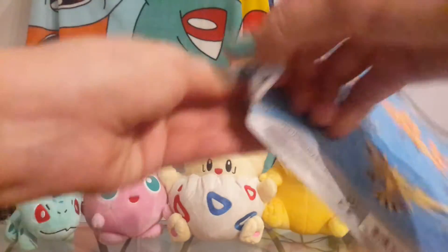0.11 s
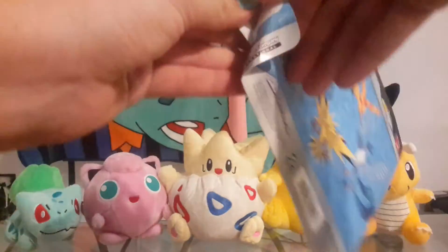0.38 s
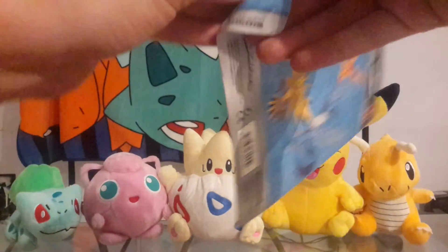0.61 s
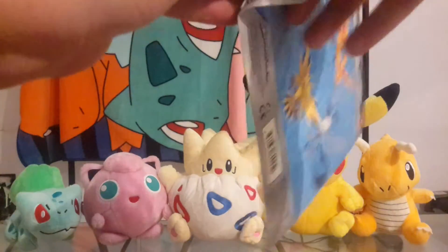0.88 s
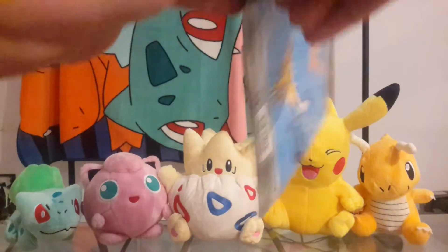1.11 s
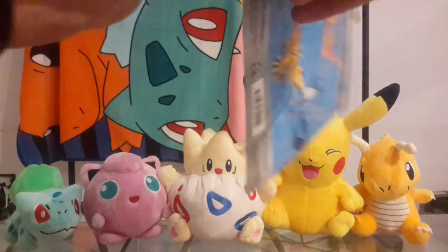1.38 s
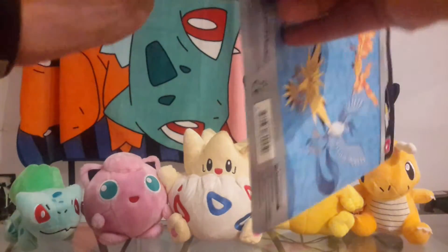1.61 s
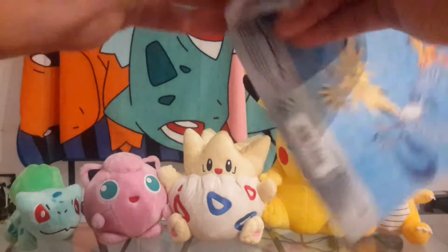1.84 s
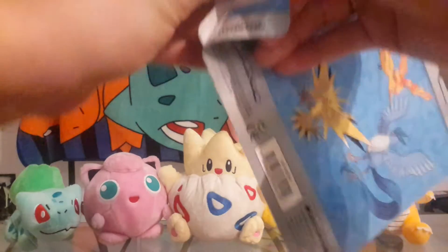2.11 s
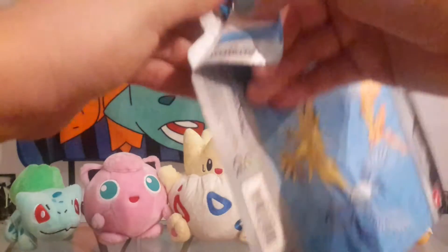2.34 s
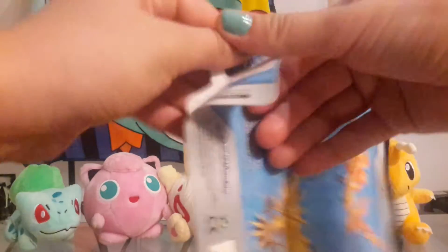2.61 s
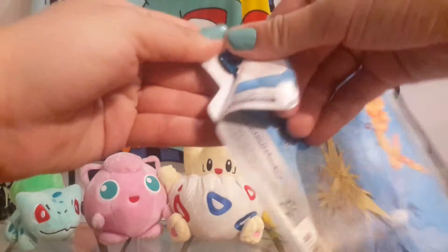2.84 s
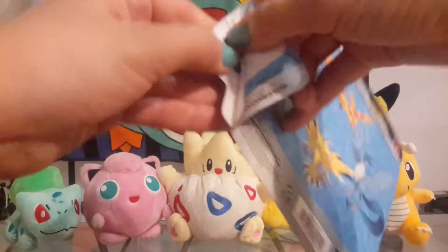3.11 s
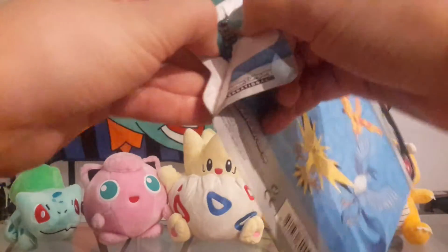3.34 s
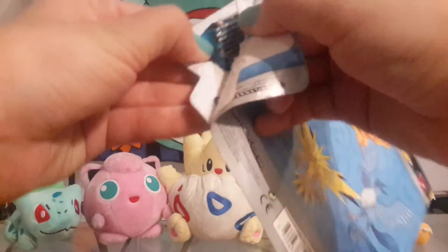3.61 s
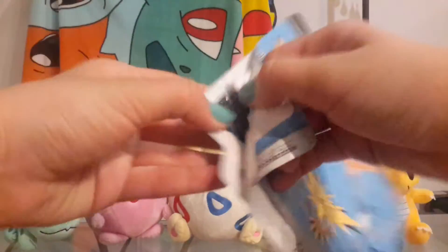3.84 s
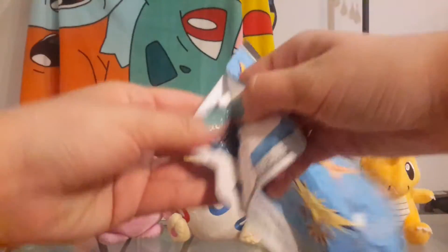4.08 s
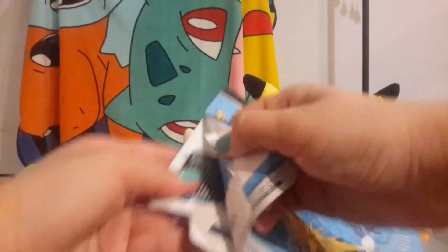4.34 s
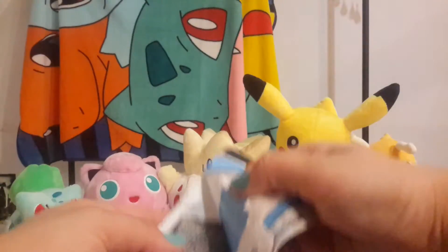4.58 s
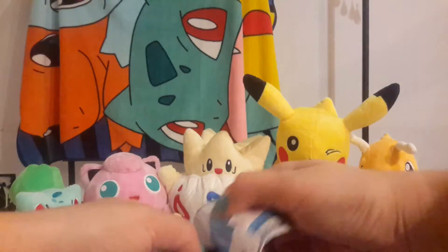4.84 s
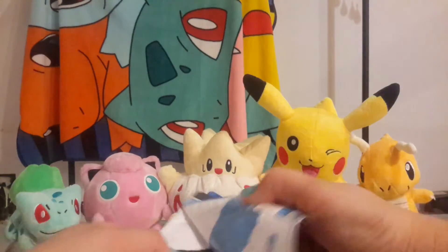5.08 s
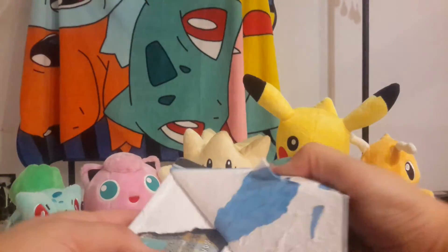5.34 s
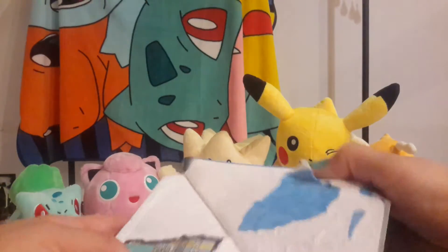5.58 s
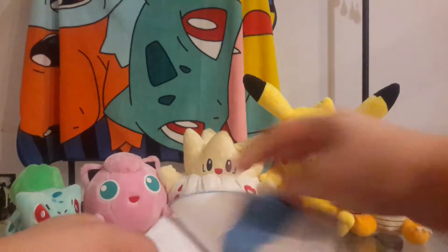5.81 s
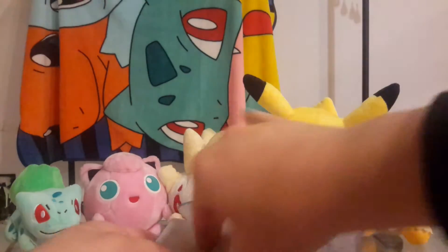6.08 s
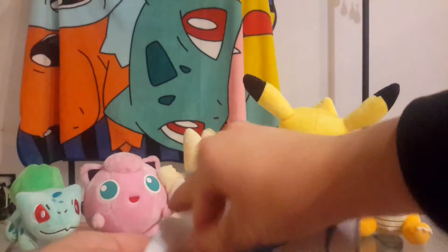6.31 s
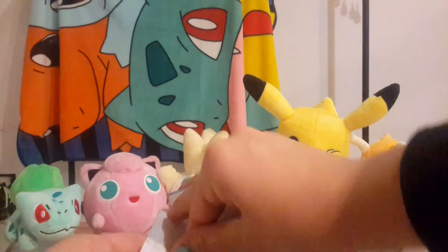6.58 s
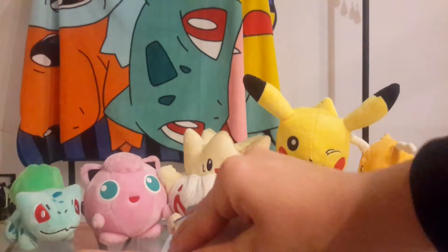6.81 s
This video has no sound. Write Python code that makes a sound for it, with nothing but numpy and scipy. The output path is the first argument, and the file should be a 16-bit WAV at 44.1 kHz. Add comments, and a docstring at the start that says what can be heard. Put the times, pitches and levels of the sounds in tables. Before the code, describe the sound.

Close hands crinkle and pry at a stiff plastic and card packet, snapping creases, then tear it open and knock it on a glass table.

```python
"""Hands pry and tear a plastic and cardboard pack close by in a quiet room, and knock it on a glass table.
Fibres break in dense crackle that rings the shell and the card; a taut shell sings as it peels.
Creases snap as a kick and a rattle; blows ring the modes of the glass; fingers thump the card dully.
Behind it lie the room's short tail, a steady hiss and a low, beating hum."""
import sys
import numpy as np
from scipy import signal
from scipy.fft import rfft, irfft
from scipy.io import wavfile
from scipy.ndimage import uniform_filter1d

SR = 44100
rng = np.random.default_rng(int(sys.argv[2]) if len(sys.argv) > 2 else 0)


def gain_from_decibels(decibels):
    """Convert decibel values to linear amplitude factors."""
    exponent = np.asarray(decibels, float) / 20
    return 10 ** exponent


def log_audio(samples):
    """Write samples as a 16-bit WAV file to the path given in sys.argv[1]."""
    # one column per channel
    frames = np.atleast_2d(samples).T
    # limit to full scale, then quantise
    limited = np.clip(frames, -1, 1)
    pcm = np.round(limited * 32767).astype(np.int16)
    wavfile.write(sys.argv[1], SR, pcm)


N = 306054  # length in samples


def evened(x):
    """Scales to rms 1."""
    return x / np.sqrt(np.mean(x ** 2) + 1e-20)


def read(points, hz):
    """Reads a spectrum in dB on a log-frequency axis, falling to -60 dB or less outside it."""
    f, value = np.transpose(points)
    low, high = min(value[0], -60), min(value[-1], -60)
    return np.interp(np.log(hz + 1), np.log(f + 1), value, left=low, right=high)


def coloured(x, points):
    """Minimum-phase filter with the given spectrum, so that nothing rings ahead of a click."""
    hz = abs(np.fft.fftfreq(4096, 1 / SR))
    log_gain = np.log(gain_from_decibels(read(points, hz)))
    taps = np.fft.ifft(np.exp(np.conj(signal.hilbert(log_gain)))).real[:2048]
    return signal.oaconvolve(x, taps)[:len(x)]


def add(mix, s, db, sound):
    """Mixes a sound in at time s with the given peak level."""
    part = mix[round(s * SR):][:len(sound)]
    part += (gain_from_decibels(db) * sound / abs(sound).max())[:len(part)]


def resonate(x, hz, width):
    """A resonance of gain 1, width in Hz, that follows the curve hz: shift down, smooth, shift back."""
    turn = np.exp(2j * np.pi * np.cumsum(hz) / SR)
    r = np.exp(-np.pi * width / SR)
    return 2 * (turn * signal.lfilter([1 - r], [1, -r], x / turn)).real


def steep(x, hz, width):
    """The resonance twice, for dark skirts."""
    return resonate(resonate(x, hz, width), hz, width)


# Spectrum of the room hiss, relative: (frequency [Hz], level [dB])
HISS_SPECTRUM = [(25, -25), (42, -9), (60, 18), (85, 0), (115, 4.5), (160, 6.5), (320, -2.5), (600, -8),
                 (1200, -5.5), (3600, -12.5), (8600, -15.5), (15300, -16), (15800, -52)]
# Lines of the low hum: (frequency [Hz], rms level before the gain swell [dB])
HUM_LINES = [(59.2, -76), (65.2, -78), (118.4, -81), (296.1, -80), (355.3, -83)]


def air():
    """Shaped noise for the hiss; sines for the hum, whose two lowest lines beat, under a slow gain swell."""
    t = np.arange(N) / SR
    spectrum = rfft(rng.standard_normal(N)) * gain_from_decibels(read(HISS_SPECTRUM, np.fft.rfftfreq(N, 1 / SR)))
    hiss = gain_from_decibels(-65) * evened(irfft(spectrum, N))
    swell_db = 3 * np.cos(2 * np.pi * (t - .15) / 1.8)  # a regular gain swell with a period of 1.8 s
    hum = sum(gain_from_decibels(db) * np.sqrt(2) * np.sin(2 * np.pi * hz * t + 1.7) for hz, db in HUM_LINES)
    return hiss + gain_from_decibels(swell_db) * hum


# Decay of the room: (frequency [Hz], t60 [s])
ROOM_DECAY = [(200, 0.33), (1000, 0.13), (4000, 0.1), (12000, 0.076)]


def room(x):
    """Reflections as sparse taps of random sign, each band dying at its own speed."""
    taps = np.zeros(SR // 2)
    at = np.arange(300, len(taps) - 20, 20)  # first one after about 7 ms
    taps[at + rng.integers(0, 20, len(at))] = rng.choice([-1., 1.], len(at))
    hz, t, z = signal.stft(taps, SR, nperseg=256)
    decay_hz, decay_s = np.transpose(ROOM_DECAY)
    t60 = np.interp(np.log(hz + 1), np.log(decay_hz), decay_s)
    tail = signal.istft(z * gain_from_decibels(-60 * t / t60[:, None]), SR, nperseg=256)[1]
    return signal.fftconvolve(x, tail / np.linalg.norm(tail))[:N]


# Spectrum of the low rub of hand on card, relative: (frequency [Hz], level [dB])
RUB_SPECTRUM = [(60, -27), (105, -5.5), (150, -2), (300, 6), (550, 5), (800, 1), (1200, -3.5)]
# Dull finger thumps on the card: (time [s], peak level [dB], ring [Hz], t60 [s], at least 8 ms is used)
FINGER_THUMPS = [(0.222, -33, 647, 0.026), (0.276, -43, 277, 0.048), (0.315, -87, 622, 0.047),
                 (1.918, -25.5, 300, 0.019), (1.921, -35.5, 543, 0.052), (1.982, -36, 470, 0.023),
                 (2.224, -44.5, 303, 0.037), (2.38, -31, 563, 0.016), (2.636, -31, 715, 0.007),
                 (3.989, -38.5, 179, 0.11), (4.282, -39, 307, 0.045), (4.754, -25.5, 340, 0.03),
                 (4.888, -14.5, 179.4, 0.063), (5.307, -29.5, 532, 0.062), (5.699, -24.5, 328, 0.034),
                 (5.857, -21, 340, 0.016), (6.723, -32, 166, 0.036), (6.755, -32, 153, .04)]


def thumps():
    """A soft push on the card: a short dull ring with some rub in it."""
    out, t = np.zeros(N), np.arange(6000) / SR
    noises = rng.standard_normal((len(FINGER_THUMPS), len(t)))
    for (s, db, hz, t60), noise in zip(FINGER_THUMPS, noises):
        fall = gain_from_decibels(-60 * t / max(t60, .008))
        ring = evened(np.sin(2 * np.pi * hz * t) * fall)
        rub = evened(coloured(noise * fall, RUB_SPECTRUM))
        attack = np.minimum(t * hz / 0.37, 1)  # full after 0.37 cycles
        add(out, s, db, (ring + 0.42 * rub) * attack)
    return out


# Spectra of the plastic shell and of the card, relative: (frequency [Hz], level [dB])
SHELL_SPECTRUM = [(2000, -3), (2500, -6), (3300, -2), (4200, -7), (5200, -11.5), (6500, -17), (8000, -24.5)]
CARD_SPECTRUM = [(550, -25), (850, -2.5), (1300, -2), (1800, 0.5), (2300, -0.5), (3000, -9)]
# Modes of the glass table top: (frequency [Hz], level [dB], t60 [s])
GLASS_MODES = [(126, -9.5, 0.14), (176, 0, .11), (234.1, -9, 0.16), (286.7, -13, 0.2), (434.7, -7, 0.16),
               (537, -1.5, 0.073), (615, -5.5, 0.058), (949, 5.5, 0.084), (980, -24, 0.24),
               (1088, -14, 0.046), (1308, 0.5, 0.027), (1421, -8.5, 0.1), (1599, -7, 0.11),
               (1775, -20, 0.19), (2090, -6.5, 0.028), (2355, -4, 0.025), (2940, -8, 0.046),
               (3200, -11.5, 0.04), (3600, -13, 0.042)]
# Pack knocked on the table: (time [s], glass peak level [dB], hardness [dB per octave],
# ring length [factor on t60], card slap relative to the glass [dB])
TABLE_KNOCKS = [(4.8752, -9, 0.2, 1, 0), (5.9627, -4.5, -0.1, 0.69, -21), (6.0404, -17.5, -2, 0.49, -10),
                (6.1155, -4.5, 0.4, 0.82, -10), (6.155, -18.5, 4.5, 0.67, -9), (6.5602, -7, 0.5, 0.68, -10),
                (6.7467, -26.5, 1, 0.49, -26), (6.915, -8, -0.5, 0.73, -8.5)]


def knocks():
    """Each blow rings all modes of the glass, a harder one the upper ones more; card slaps and a hard edge ticks."""
    out, t = np.zeros(N), np.arange(12000) / SR
    hz, mode_db, t60 = np.transpose(GLASS_MODES)[:, :, None]
    spots = rng.standard_normal((len(TABLE_KNOCKS), 2, len(GLASS_MODES), 1))  # mode levels and phases vary by blow
    noises = rng.standard_normal((len(TABLE_KNOCKS), len(t)))
    build_cycles = 2.2
    rise = np.sin(np.pi / 2 * np.minimum(t * hz / build_cycles, 1)) ** 2  # low modes take longer to build
    for (s, db, tilt_db, length, slap_db), spot, noise in zip(TABLE_KNOCKS, spots, noises):
        level_db = mode_db + tilt_db * np.log2(hz / 900) + spot[0] - 60 * t / (t60 * length)
        modes = rise * gain_from_decibels(level_db) * np.sin(2 * np.pi * hz * t + .5 * spot[1])
        add(out, s, db, -modes.sum(0))
        slap = noise * gain_from_decibels(-60 * t / 0.05)
        slap = evened(coloured(slap, CARD_SPECTRUM)) + 0.38 * evened(coloured(slap, SHELL_SPECTRUM))
        add(out, s, db + slap_db, slap)
        tick = noise[::-1] * gain_from_decibels(-60 * t / 0.017)
        add(out, s, db - 27.5, steep(tick, np.full(len(t), 4700), width=920))
    return out


# How hard the hands work the pack: (time [s], shell rustle level [dB])
HAND_EFFORT = [(0, -54), (.088, -41), (.15, -58.5), (.22, -50.5), (.331, -48.5), (.373, -52.5),
               (.449, -76.5), (.51, -80.5), (.55, -66), (.629, -56.5), (.744, -59.5), (.802, -55.5),
               (.835, -59), (.86, -73), (.956, -75), (.996, -60), (1.058, -77), (1.153, -84),
               (1.193, -53.5), (1.231, -77), (1.411, -72), (1.527, -59.5), (1.67, -60), (1.81, -40.5),
               (1.87, -44), (1.95, -49), (2.069, -59), (2.125, -49), (2.305, -60), (2.378, -46),
               (2.386, -44), (2.45, -44.5), (2.546, -53.5), (2.736, -53.5), (2.78, -61), (2.895, -50.5),
               (3.039, -68.5), (3.159, -62), (3.201, -72), (3.243, -58), (3.332, -57), (3.464, -48.5),
               (3.51, -37), (3.518, -28.5), (3.652, -43.5), (3.713, -30), (3.759, -32), (3.853, -38.5),
               (3.903, -48), (4.065, -51), (4.099, -62), (4.198, -65.5), (4.228, -46.5), (4.273, -63),
               (4.281, -51), (4.398, -41.5), (4.448, -26), (4.496, -17.5), (4.525, -22.5), (4.606, -18.5),
               (4.691, -38), (4.765, -43.5), (4.809, -54.5), (4.876, -52.5), (4.881, -32.5), (4.941, -49),
               (5.009, -47), (5.017, -35.5), (5.096, -31.5), (5.14, -22.5), (5.2, -25), (5.225, -18),
               (5.28, -25.5), (5.315, -22.5), (5.365, -27.5), (5.41, -23.5), (5.474, -28), (5.555, -21),
               (5.609, -29), (5.66, -26.5), (5.695, -17), (5.73, -21), (5.76, -32.5), (5.803, -41),
               (5.867, -38.5), (5.962, -49), (6.014, -37), (6.115, -40), (6.123, -34.5), (6.21, -44.5),
               (6.38, -55.5), (6.471, -36), (6.505, -46), (6.6, -53.5), (6.69, -47.5), (6.745, -48),
               (6.751, -36), (6.8, -39.5), (6.858, -51), (6.914, -40.5), (6.94, -42)]
# Colour of the rustle, sometimes changing within some 50 ms:
# (time [s], shell ring [Hz], extra card [dB], extra fibre [dB])
RUSTLE_COLOUR = [(0, 4060, 1, 10), (.09, 4000, -7, -6), (.33, 3500, 5.5, 0), (.7, 3850, -4.5, -3),
                 (.95, 3970, -4.5, 9), (1.2, 3920, -3.5, 7.5), (1.4, 4430, -2, -1), (1.53, 4800, -3, 1),
                 (1.68, 4400, -4, 4), (1.8, 4230, -7, 3), (1.86, 4030, 0, 16), (1.94, 3400, 7, 1),
                 (2.3, 3720, 4.5, 5.5), (2.38, 3840, 2.5, -11), (2.5, 3600, -4, -0.5),
                 (2.75, 3600, 9.5, 4.5), (3.24, 3370, 6.5, 1), (3.33, 4430, 6, 4), (3.5, 3600, -6, 3.5),
                 (3.54, 3550, 0.5, 2), (3.63, 3700, -7, 4), (3.7, 3520, -9.5, 10), (3.86, 3500, -11, 9),
                 (3.97, 3400, 5.5, -2.5), (4.3, 3250, 2.5, -2), (4.4, 4700, -6, 6.5), (4.5, 3160, -6, 0),
                 (4.7, 3120, -1, 1), (4.8, 3050, 12, -7), (4.88, 3400, 10, -6), (4.95, 3170, 8, -4),
                 (5.1, 3270, -0.5, -1.5), (5.24, 3470, 7.5, 3.5), (5.468, 2920, 2.5, 0),
                 (5.75, 3600, 3, -4.5), (5.95, 3140, 9, -1.5), (6.2, 3120, 7, -6), (6.45, 3350, 8, -4.5),
                 (6.6, 2960, 6, 0), (6.94, 3400, 7, -6)]


def controls(t):
    """Card and fibres follow the shell, the low rub follows the card: shell dB, ring Hz, card, fibre, rub dB."""
    s, *colour = np.transpose(RUSTLE_COLOUR)
    shell_db = np.interp(t, *np.transpose(HAND_EFFORT))
    shell_hz, card_extra_db, fibre_extra_db = (np.interp(t, s, c) for c in colour)
    # each law: level when the leader is at -50 dB, then dB per dB
    card_db = -57 + 0.9 * (shell_db + 50) + card_extra_db
    fibre_db = -63.5 + 0.97 * (shell_db + 50) + fibre_extra_db
    rub_db = -56.5 + 0.64 * (card_db + 50)
    return shell_db, shell_hz, card_db, fibre_db, rub_db


def small_creases():
    """Lesser creases at random moments, 22 per s, riding on the effort; rows like those of the snaps."""
    count = round(22 * N / SR)
    s, draw = rng.random(count) * N / SR, rng.standard_normal((4, count))
    shell_db, shell_hz = controls(s)[:2]
    peak_db = -50 + 0.802 * (shell_db + 50) + 6.5 + 3 * draw[0]
    ring_hz = shell_hz * 2 ** (0.3 * draw[1])
    crack_db, thud_db = -8.5 + 5 * draw[2], -18.5 + 5 * draw[3]
    return list(zip(s, peak_db, ring_hz, crack_db, thud_db))


# Spectrum of the fibre hiss, relative: (frequency [Hz], level [dB])
FIBRE_SPECTRUM = [(5000, -3.5), (6500, -2), (8500, -2), (11000, -4.5), (13500, -6), (15300, -5),
                  (15700, -84.5)]
# Creases snapping, with the row at 4.876 s giving the crack of the knock on the table there: (time [s], ring
# peak level [dB], ring [Hz], treble crack relative to the ring [dB], card thud relative to the ring [dB])
CREASE_SNAPS = [(.0294, -39, 5070, 2, -18), (.062, -28.5, 5660, -18, -23), (.165, -38.5, 4350, -5, -7),
                (.2166, -26.5, 3320, -19, -8), (.223, -20.5, 2430, -33, -0.5), (.277, -27, 3750, -29, -5.5),
                (.3184, -31.5, 3180, -16, 4.5), (1.0454, -43, 3940, -21, -11),
                (1.3727, -49.5, 4460, -2, -17), (1.502, -47, 6200, 0, -22), (1.5128, -40, 4400, -5, -22),
                (1.539, -40.5, 6400, -8, -26), (1.5672, -39, 4300, -10, -25), (1.588, -43, 5640, -15, -21),
                (1.5988, -47, 5900, -2, -22), (1.611, -35, 5870, -13, -19), (1.7019, -39, 3580, -4, -9),
                (1.813, -25, 3940, -5, -14), (1.843, -39, 5000, 15, -20), (1.875, -35.5, 5040, 15.5, -20),
                (1.9246, -33.5, 2140, -20, 6), (1.98, -28.5, 4800, -5, -17), (2.1095, -27, 3380, -24, -7),
                (2.1322, -25, 3570, -28, -8.5), (2.1682, -27, 2680, -17, -17),
                (2.1892, -25, 3800, -14, -14), (2.331, -18, 4430, -11, -14.5),
                (2.3633, -17.5, 4200, -10, -19), (2.3798, -2.5, 4060, -8.5, -17.5),
                (2.396, -20, 5100, -51, -19), (2.413, -21, 3970, -43, -27), (2.4915, -32, 4100, -28, -21),
                (2.5683, -35.5, 3490, -21, 1.5), (2.638, -38, 3800, -6, -10),
                (2.707, -32.5, 4200, -14, -24), (2.7412, -32.5, 5800, -9, -5),
                (2.7935, -35.5, 3600, -18, -2.5), (3.164, -42.5, 4200, -10, -19),
                (3.3132, -36, 4000, -2, -24), (3.332, -34, 4180, -8, -19), (3.3494, -31, 4900, -10, -16),
                (3.363, -31, 2210, -10, -8), (3.385, -33, 4500, -6, -23), (3.4064, -26, 4000, -11, -16),
                (3.431, -33, 4100, -2, -19), (3.4785, -19, 4160, -7, -16), (3.505, -16, 5570, -10, -30),
                (3.5124, -10, 4760, -15, -2.5), (3.5212, -16, 2440, -13, 2), (3.5258, -8.5, 4070, -12, -12),
                (3.5745, -14, 3620, -5, -28), (3.6339, -17.5, 3900, -13, -20), (3.6979, -21, 3400, 0, -26),
                (3.9544, -12, 3100, -16, -10), (3.9924, -23, 3750, -14, -15), (4.1495, -29, 3650, -22, -17),
                (4.2745, -8, 3400, -20.5, -17), (4.2855, -22, 3290, -38, -4), (4.3352, -29, 3200, -16, -11),
                (4.3568, -24, 5050, -10, -23), (4.4153, -28, 3140, -14, -4), (4.438, -15, 3500, -17, -26),
                (4.4524, -10.5, 3130, -10, -25), (4.5068, -25, 3380, -20, -34),
                (4.541, -25, 3080, -23, -26), (4.582, -10, 3120, -25, -15), (4.7185, -21, 2970, -8, -.5),
                (4.755, -25, 3070, -14, -1), (4.826, -27, 4070, -4, -23), (4.8487, -26.5, 3140, -11, -4),
                (4.876, -6.5, 3600, -19.5, -32), (4.963, -26.5, 3100, -26, -8),
                (5.0114, -14.5, 3640, -6.5, -15), (5.0319, -14.5, 3430, -15, -5),
                (5.073, -8.5, 3600, -16, -32), (5.3914, -20, 3380, -6, 5.5), (5.5075, -29, 3120, -23, 4),
                (5.726, -10, 3700, -22, -3), (5.7785, -21, 3060, -17, -7), (5.8607, -12.5, 2540, -24, 2),
                (5.9238, -27, 2680, -23, -5), (6.0422, -11, 2150, -24, -16), (6.1167, -22, 2310, -33, -10),
                (6.26, -38, 2600, -17, 10.5), (6.4035, -19.5, 3880, -19, -16),
                (6.7465, -10.5, 2100, -44, -2.5)]


def snaps():
    """A crease flips: one sharp kick and a few ms of rattle, heard through shell, fibres and card."""
    out, t = np.zeros(N), np.arange(2000) / SR
    rows = [*CREASE_SNAPS, *small_creases()]
    t60_s = np.array([[.018], [.0105], [.0195]])  # shell, fibres, card
    for (s, db, hz, crack_db, thud_db), noise in zip(rows, rng.standard_normal((len(rows), 3, len(t)))):
        burst = noise * gain_from_decibels(-60 * t / t60_s)
        burst[:, 0] = [6, 2, 5]  # the kick
        ring = steep(burst[0], np.full(len(t), hz), width=900)
        add(out, s, db, evened(ring) + .6 * evened(coloured(burst[0], SHELL_SPECTRUM)))
        add(out, s, db + crack_db, coloured(burst[1], FIBRE_SPECTRUM))
        add(out, s, db + thud_db, coloured(burst[2], CARD_SPECTRUM))
    return out


def breaks(per_s, spread_db, clump_db):
    """Random clicks in clumps of some ms; a positive spread gives many small and a few large ones."""
    sizes = gain_from_decibels(spread_db * np.minimum(rng.exponential(1, N), 5)) * rng.choice([-1, 1], N)
    clumps = evened(uniform_filter1d(uniform_filter1d(rng.standard_normal(N), size=150), size=150))
    return sizes * (rng.random(N) < per_s / SR) * gain_from_decibels(clump_db * clumps)


def patchy(x, depth_db):
    """The bending sheets favour other frequencies from moment to moment."""
    z = signal.stft(x, nperseg=512)[2]
    field = rng.standard_normal(z.T.shape)
    field = uniform_filter1d(uniform_filter1d(field, size=6, axis=0), size=7, axis=1)
    return signal.istft(z * gain_from_decibels(depth_db * evened(field).T), nperseg=512)[1][:N]


def shell_rustle(fine, ticks, thin, shell_hz):
    """The plastic rings where it bends; a small, high-ringing fold also crinkles above its ring."""
    shell = evened(coloured(fine, SHELL_SPECTRUM)) + 1.19 * evened(steep(fine, shell_hz, width=1310))
    return shell + 1.76 * thin * evened(steep(ticks, 1.3 * shell_hz, width=2100))


# Ring of the card, moving as it bends: (time [s], ring [Hz])
CARD_RING_CURVE = [(0, 1400), (1.85, 1500), (2, 1200), (2.39, 1730), (2.75, 1020), (3.52, 1350),
                   (3.75, 1620), (4, 1230), (4.5, 1620), (4.62, 1440), (5.2, 1320), (5.47, 1310),
                   (5.56, 1310), (5.75, 1450), (6.1, 1220), (6.94, 1370)]


def card_rustle(fine, shell_db, t):
    """The card colours the crackle; only a hard pull makes its ring stand out."""
    taut = np.clip((shell_db + 55) / 35, 0, 1)
    card_hz = np.interp(t, *np.transpose(CARD_RING_CURVE))
    return evened(coloured(fine, CARD_SPECTRUM)) + 1.05 * taut * evened(steep(fine, card_hz, width=470))


# The taut shell singing while it peels: (time [s], pitch [Hz], level [dB])
PEEL_CURVE = [(4.43, 3380, -40), (4.445, 3200, -39), (4.49, 3450, -34), (4.55, 3210, -21.5),
              (4.59, 3130, -26), (4.64, 3140, -28), (4.67, 2960, -40)]


def peel(fine, t):
    """The shell is pulled taut and sings, its level pulsing as the seal lets go in small jerks."""
    s, peel_hz, peel_db = np.transpose(PEEL_CURVE)
    unsteady = evened(uniform_filter1d(rng.standard_normal(N), size=400))
    slips_per_s = 120 * (1 + .35 * unsteady)
    slips = np.cos(2 * np.pi * np.cumsum(slips_per_s) / SR)
    song = gain_from_decibels(6 * slips) * steep(fine, np.interp(t, s, peel_hz), width=250)
    return gain_from_decibels(np.interp(t, s, peel_db, -120, -120)) * evened(song)


def handling():
    """One crackle of breaking fibres drives shell, card, fibre hiss and peel; a sparser one makes the low rub."""
    t = np.arange(N) / SR
    shell_db, shell_hz, card_db, fibre_db, rub_db = controls(t)
    crackle = evened(breaks(per_s=5000, spread_db=2.8, clump_db=2.2))
    fine = crackle + .6 * rng.standard_normal(N)  # skin and paper sliding fill the gaps
    ticks = evened(breaks(per_s=350, spread_db=3, clump_db=2))  # separate thin ticks
    thin = np.clip((shell_hz - 3700) / 800, 0, 1)  # how small and high-ringing the fold is
    shell = shell_rustle(fine, ticks, thin, shell_hz)
    card = card_rustle(fine, shell_db, t)
    fibre = coloured(crackle + thin * ticks + 1.4 * rng.standard_normal(N), FIBRE_SPECTRUM)
    rub = coloured(breaks(per_s=540, spread_db=-2.5, clump_db=-0.5), RUB_SPECTRUM)
    sheets = (gain_from_decibels(shell_db) * evened(shell) + gain_from_decibels(card_db) * evened(card)
              + gain_from_decibels(fibre_db) * evened(fibre) + gain_from_decibels(rub_db) * evened(rub))
    return patchy(sheets, depth_db=2) + peel(fine, t)


def scene():
    """All sources, their room tail 14 dB down and the still air."""
    hands = handling() + snaps() + knocks() + thumps()
    return (hands + gain_from_decibels(-14) * room(hands) + air())[None]


def band_limit(x):
    """A steep low-pass at the top of the band."""
    return signal.sosfilt(signal.butter(12, 16840, fs=SR, output="sos"), x)


def record(dry):
    """A high-pass takes off the deep bass; a low-pass ends the treble near 17 kHz."""
    cut = signal.sosfilt(signal.butter(N=3, Wn=45, btype="high", fs=SR, output="sos"), dry)
    cut = signal.sosfilt(signal.cheby2(N=12, rs=60, Wn=17500, fs=SR, output="sos"), cut)
    return band_limit(cut)


dry = scene()
out = record(dry)
log_audio(out)
```